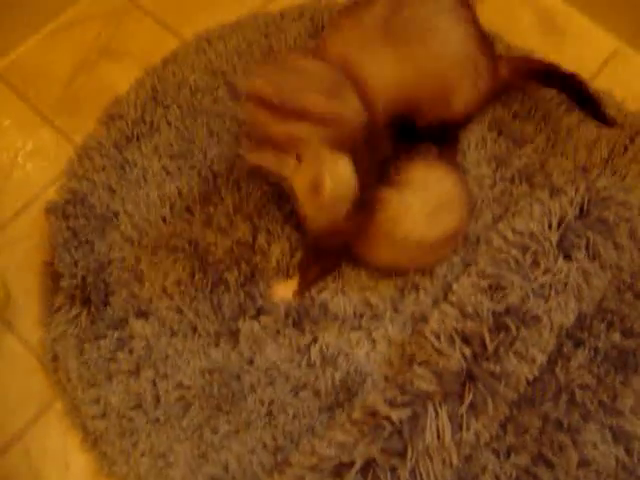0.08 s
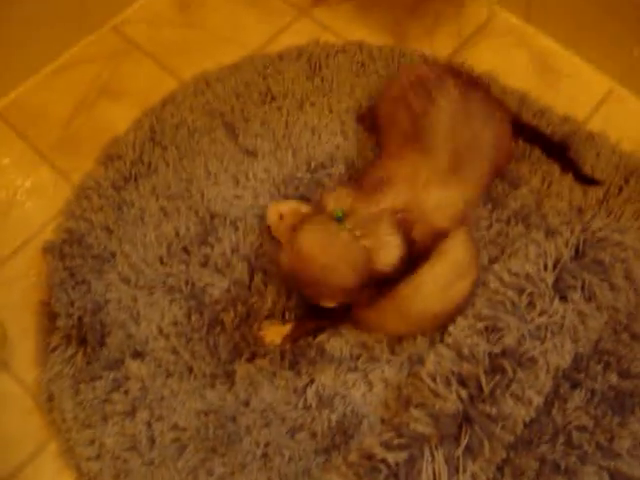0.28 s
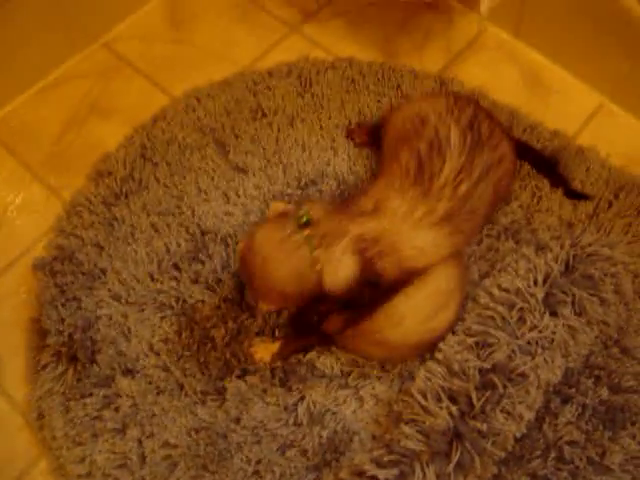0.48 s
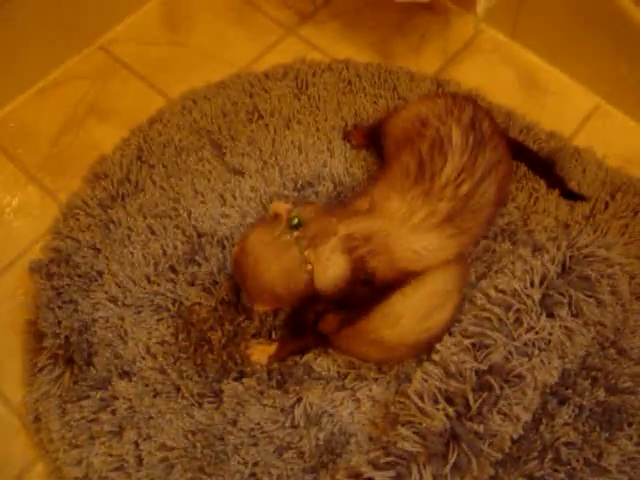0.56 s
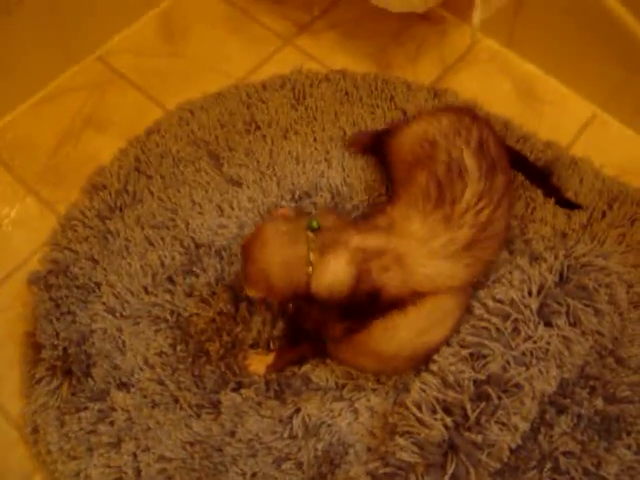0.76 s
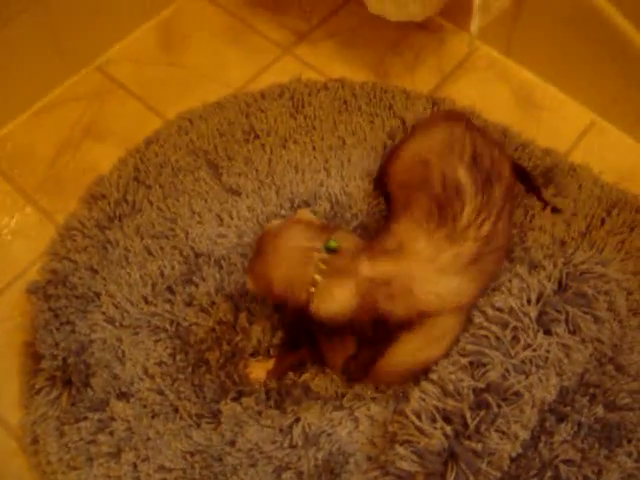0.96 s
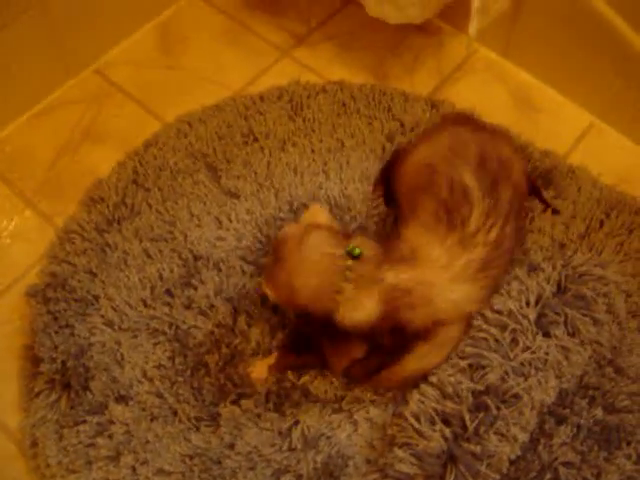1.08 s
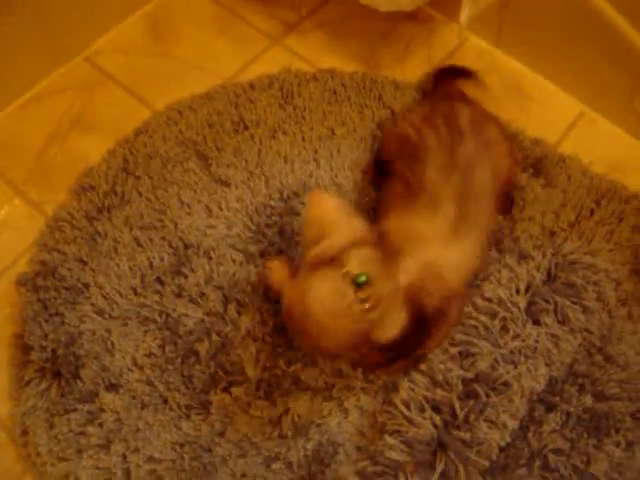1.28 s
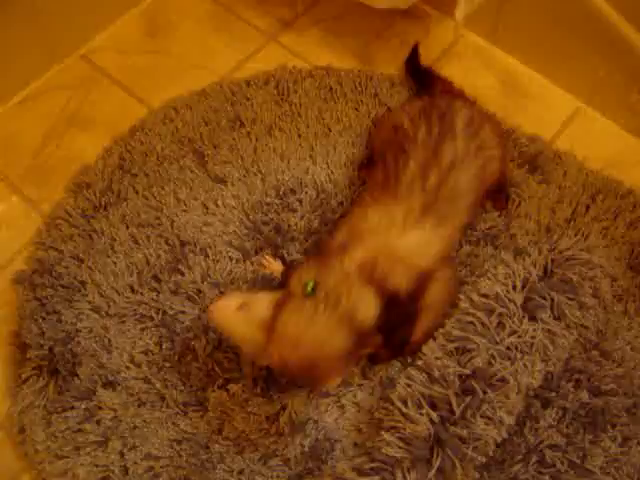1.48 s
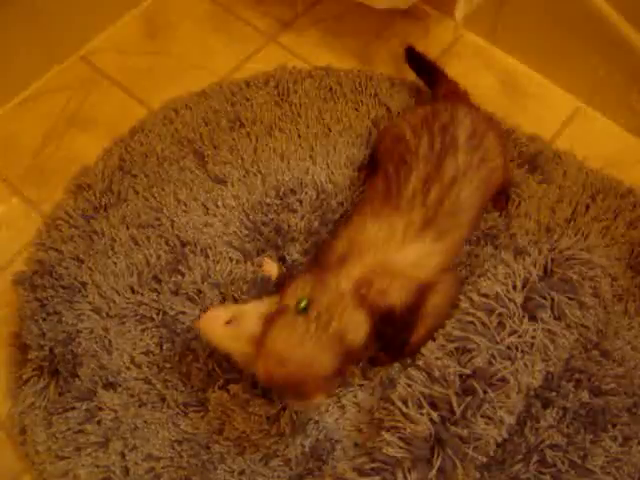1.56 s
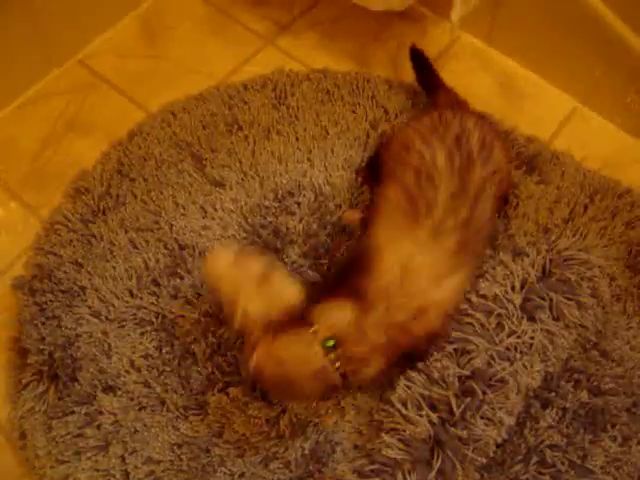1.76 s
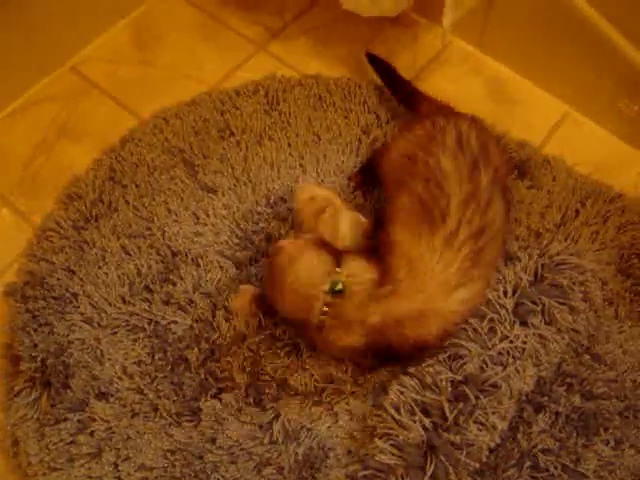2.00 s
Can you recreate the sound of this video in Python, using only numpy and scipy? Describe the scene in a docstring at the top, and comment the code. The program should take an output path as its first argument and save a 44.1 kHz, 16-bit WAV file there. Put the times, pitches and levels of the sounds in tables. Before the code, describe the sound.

Small pet bell jingling in clipped rattles, with faint huffs, soft bumps and one ferret yelp.

```python
"""Ferrets wrestling with a collar bell

Two ferrets tumble in a shaggy pet bed in a quiet tiled room: noise bumps, scratching grains, modal snaps.
A tiny collar bell chatters in short, abruptly ending bursts: one high stuttering mode and rattling clicks.
One ferret huffs (air and two tones), whines thinly (sagging sines) and squeaks once (harmonics and rasp).
Hiss, a low hum and a rumble lie beneath."""
import sys
import numpy as np
from scipy import signal
from scipy.fft import rfft, irfft
from scipy.io import wavfile

SR = 44100
rng = np.random.default_rng(int(sys.argv[2]) if len(sys.argv) > 2 else 0)


def master_out(mix):
    """Clip the mix to full scale and print it as 16-bit PCM to the path in sys.argv[1]."""
    frames = np.transpose(np.atleast_2d(mix))
    ceiling = np.clip(frames, -1, 1)
    pcm = np.round(ceiling * 32767).astype(np.int16)
    wavfile.write(sys.argv[1], SR, pcm)


N = 88200
T = np.arange(N) / SR  # seconds


def amp(db):
    """Decibels to gain."""
    return 10 ** (np.asarray(db) / 20)


def unit(x):
    """Scales to rms 1."""
    return x / np.sqrt(np.mean(abs(x) ** 2) + 1e-20)


def read(points, hz):
    """Reads a table of (frequency, value) on a log-frequency axis."""
    f, value = np.transpose(points)
    return np.interp(np.log(hz + 1), np.log(f + 1), value)


def colour(x, points):
    """Filters x by a table of (Hz, dB), then scales to rms 1."""
    gain = amp(read(points, np.fft.rfftfreq(N, 1 / SR)))
    return unit(irfft(rfft(x) * gain, N))


def drift(width_hz):
    """Smooth random motion: noise under a Gaussian low-pass, at rms 1."""
    hz = np.fft.rfftfreq(N, 1 / SR)
    lowpass = np.exp(-.5 * (hz / width_hz) ** 2)
    return unit(irfft(rfft(rng.standard_normal(N)) * lowpass, N))


def gate(start_s, length_s, edge_s):
    """Opens, holds and shuts with soft edges."""
    inside_s = np.minimum(T - start_s, start_s + length_s - T)
    return np.sin(np.pi / 2 * np.clip(inside_s / edge_s + .5, 0, 1)) ** 2


def blow(start_s, rise_s, t60_s):
    """Quick linear rise on an exponential decay of 60 dB per t60."""
    age = np.maximum(T - start_s, 0)
    return np.minimum(age / rise_s, 1) * np.exp(-np.log(1000) * age / t60_s)


def grains(per_s, spread_db):
    """Random clicks of either sign and uneven size."""
    struck = rng.random(N) < per_s / SR
    return struck * rng.choice([-1, 1], N) * amp(spread_db * rng.standard_normal(N))


def sweep(hz):
    """Running phase in radians of a moving pitch."""
    return 2 * np.pi * np.cumsum(hz) / SR


def background():
    """Steady coloured hiss, a wavering hum with its octave, and an uneven low rumble."""
    # hiss spectrum: frequency_hz, relative_level_db
    air = [(15, -43), (25, -28), (211, -2.5), (879, -7.5), (1640, -11.5), (3760, -14), (10000, -18),
           (13000, -46), (22000, -120)]
    # swell of the hum: time_s, rms_level_db
    hum_level = [(0, -99), (.33, -63.5), (.7, -89.5), (1.1, -70), (2, -66)]
    hum_hz, octave_db, air_db = 117.8, -80.5, -58
    rumble_hz, rumble_db, rumble_swell = 83.5, -71, 0.43
    phase = 2 * np.pi * hum_hz * T + .5 * drift(width_hz=5.5)
    hum = amp(np.interp(T, *np.transpose(hum_level))) * np.sin(phase)
    hum += amp(octave_db) * np.sin(2 * phase)
    swell = np.exp(rumble_swell * drift(width_hz=4.8))
    rumble = unit(drift(width_hz=28) * np.sin(2 * np.pi * rumble_hz * T) * swell)
    hiss = colour(rng.standard_normal(N), air)
    return amp(air_db) * hiss + np.sqrt(2) * hum + amp(rumble_db) * rumble


def room(x):
    """The tail of the tiled room: scattered echoes under a decay set for each frequency."""
    # decay of the room: frequency_hz, t60_s
    room_t60 = [(200, 0.23), (2000, 0.232), (8000, 0.23)]
    taps = grains(per_s=2800, spread_db=7) * (T > .006)  # no echo before 6 ms
    hz, t, z = signal.stft(taps, SR, nperseg=256)
    decay = np.exp(-np.log(1000) * t / read(room_t60, hz)[:, None])
    tail = signal.istft(z * decay, SR, nperseg=256)[1]
    return signal.fftconvolve(x, tail / np.linalg.norm(tail))[:N]


def scuffle():
    """Claws and fur scratch the pile as coloured grains; bodies bump the cushion as dull noise bursts."""
    # scratches in the pile: start_s, length_s, level_db
    scratches = [(0.097, 0.0055, -38.5), (.122, .003, -38.5), (0.129, 0.012, -41.5), (0.205, 0.015, -36.5)]
    # scratch spectrum: frequency_hz, relative_level_db
    scratch_colour = [(4000, -37), (7000, -13), (8300, -6.5), (9900, -6.5)]
    # bumps on the cushion: start_s, level_db, t60_s, lower_edge_hz, upper_edge_hz
    bumps = [(0.239, -44, 0.064, 313, 486), (0.267, -54.5, 0.31, 89.4, 440),
             (0.323, -52.5, 0.08, 687, 1000), (1.662, -42, 0.15, 192, 1210), (1.688, -48, 0.36, 122, 400)]
    scratch = colour(grains(per_s=9220, spread_db=11.0), scratch_colour)
    out = sum(gate(s, length, edge_s=.002) * amp(db) for s, length, db in scratches) * scratch
    for s, db, t60, low_hz, top_hz in bumps:
        band = signal.butter(3, [low_hz, top_hz], "band", fs=SR, output="sos")
        thud = unit(signal.sosfilt(band, rng.standard_normal(N)))
        out += amp(db) * blow(s, .00077, t60) * thud
    return out


def snaps():
    """Small snaps of teeth or claws: a brief noise crack and a few hard, quickly dying modes."""
    # snaps: start_s, level_db
    snap_times = [(0.437, -43.5), (1.418, -38.5), (1.718, -53)]
    # ringing modes of a snap: frequency_hz, relative_level_db, t60_s
    modes = [(2402, -0.5, 0.017), (2710, -3.5, 0.0088), (3300, -5.5, 0.0098), (3870, -1, 0.0087),
             (4550, -4, 0.01)]
    crack_db, crack_t60_s, rise_s = 3, 0.0068, .0005
    out = np.zeros(N)
    for s, db in snap_times:
        ring = sum(amp(mode_db) * blow(s, rise_s, t60) * np.sin(2 * np.pi * (hz * T + rng.random()))
                   for hz, mode_db, t60 in modes)
        crack = amp(crack_db) * blow(s, rise_s, crack_t60_s) * rng.standard_normal(N)
        out += amp(db) * (ring + crack)
    return out


def huffs():
    """Short grunting puffs: air and two firm, wavering tones from a ferret's open mouth."""
    # puffs: start_s, length_s, air_level_db, mouth_resonance_level_db
    puffs = [(0.532, 0.096, -52, -52.5), (0.59, 0.068, -64.5, -61.5), (1.521, 0.12, -55, -68)]
    # breath spectrum: frequency_hz, relative_level_db
    breath = [(300, -3.5), (850, -3), (1150, 1), (1600, -5), (9000, -13.5)]
    lower_hz, upper_hz, waver, upper_db = 926, 1280, .02, -2
    air = colour(rng.standard_normal(N), breath)
    lower, upper = (np.sin(sweep(hz * (1 + waver * drift(width_hz=76)))) for hz in (lower_hz, upper_hz))
    mouth = unit(lower + amp(upper_db) * upper)
    out = np.zeros(N)
    for s, length, air_db, mouth_db in puffs:
        progress = np.clip((T - s) / length, 0, 1)
        puff = np.sin(np.pi * progress ** .5) ** 2  # the root makes it peak early
        out += puff * (amp(air_db) * air + amp(mouth_db) * mouth)
    return out


def whines():
    """Thin wheezy whistles: sines that swell, then sag in pitch and fray."""
    # whines: start_s, length_s, pitch_hz, sag_hz, relative_level_db
    calls = [(1.06, .32, 3650, 520, 0), (1.06, .28, 2700, 130, -8.5), (.84, .3, 1660, 20, -8),
             (1.32, .17, 1625, 5, -2)]
    sag_power, fray, flutter = 2.8, 0.025, 0.63
    out = np.zeros(N)
    for s, length, pitch_hz, sag_hz, db in calls:
        progress = np.clip((T - s) / length, 0, 1)
        hz = pitch_hz - sag_hz * progress ** sag_power
        hz = hz * (1 + fray * progress * drift(width_hz=300))
        swell = np.sqrt(abs(np.sin(np.pi * progress))) * (1 + flutter * drift(width_hz=53))
        out += amp(db) * swell * unit(np.sin(sweep(hz)))
    return out


def squeak():
    """A yelp starts raspy and slides down; upper overtones hold pitch while the mouth resonance sinks."""
    # course of the squeak: time_s, pitch_hz, roughness (0-1), mouth_resonance_hz
    course = [(1.597, 740, .7, 3200), (1.608, 660, .3, 3280), (1.628, 660, .16, 2750),
              (1.67, 654, .14, 2050)]
    # its loudness: time_s, fundamental_db, second_harmonic_db, upper_harmonics_db
    loudness = [(1.5961, -47, -56, -64), (1.597, -39, -44, -39), (1.609, -40.5, -39, -41),
                (1.617, -41, -55.5, -42), (1.628, -54.5, -47, -41), (1.633, -38, -40, -62),
                (1.641, -39, -46.5, -63), (1.658, -61, -75.5, -57), (1.74, -75, -70, -74.5)]
    # throat spectrum: frequency_hz, relative_level_db
    throat = [(600, -20), (1500, 1), (2600, -1), (3250, 1), (3900, -4), (4500, -11), (5500, -23)]
    jitter_depth, shimmer_depth, rasp_depth = 0.07, .8, 1.45  # at roughness 1
    peak_db, peak_width_hz = 6.5, 450  # mouth resonance

    times, *columns = np.transpose(course)
    hz, rough, peak_hz = (np.interp(T, times, c) for c in columns)
    times, *columns = np.transpose(loudness)
    first, second, upper = (amp(np.interp(T, times, c, left=-np.inf, right=-np.inf)) for c in columns)
    jitter = 1 + jitter_depth * rough * drift(width_hz=282)
    settled_hz = hz[-1]
    phase, held = sweep(hz * jitter), sweep(settled_hz * jitter)

    def partial(angle):
        """One harmonic, fluttering with the roughness."""
        shimmer = 1 + shimmer_depth * rough * drift(width_hz=150)
        return np.sqrt(2) * np.sin(angle + 2 * np.pi * rng.random()) * shimmer

    orders = np.arange(3, 8)
    freqs = settled_hz * orders[:, None]
    mouth_peak = peak_db * np.exp(-((freqs - peak_hz) / peak_width_hz) ** 2)
    gains = amp(read(throat, freqs) + mouth_peak)
    gains = gains / np.linalg.norm(gains, axis=0)  # the peak moves without changing total power
    overtones = sum(g * partial(k * held) for k, g in zip(orders, gains))
    # the rasp is noise pulsing once per pitch cycle
    rasp_gain = rasp_depth * rough
    rasp = rasp_gain * colour(rng.standard_normal(N) * (1 + np.cos(phase)), throat)
    top = (overtones + rasp) / np.hypot(1, rasp_gain)
    return first * partial(phase) + second * partial(2 * phase) + upper * top


def bell():
    """Short gated bursts of one high, narrow-band mode at an evened, stuttering level, with rattling clicks."""
    # shakes of the collar bell: start_s, length_s, ring_level_db, pellet_rattle_level_db
    shakes = [(0.018, 0.0089, -53, -63), (0.064, 0.0018, -43.5, -43), (0.19, 0.019, -42.5, -75),
              (0.207, 0.017, -47.5, -44), (0.2306, 0.016, -16, -27.5), (0.258, 0.007, -18, -60),
              (0.2645, 0.018, -24, -44), (0.286, 0.013, -27, -34), (0.305, 0.012, -14.5, -29.5),
              (0.3204, 0.0046, -14.5, -27), (.333, 0.013, -28.5, -43), (0.347, 0.0063, -32, -51),
              (0.36, 0.01, -28, -44), (0.371, 0.027, -36.5, -51), (.405, 0.017, -43, -53),
              (0.445, 0.019, -53.5, -72), (0.509, 0.0051, -50, -75), (1.229, 0.0076, -26, -35),
              (1.239, 0.021, -30, -44), (1.2642, 0.0043, -34.5, -70), (1.27, 0.0095, -46, -45),
              (1.287, 0.043, -45.5, -52.5), (1.344, 0.0032, -42.5, -75), (1.374, 0.0072, -44, -54),
              (1.421, 0.0037, -37.5, -73), (1.427, 0.0097, -48, -48.5), (1.467, 0.0064, -37.5, -47.5),
              (1.507, 0.018, -46, -53), (1.534, 0.0084, -46, -61), (1.599, 0.0082, -37, -42),
              (1.633, 0.03, -55, -57), (1.772, 0.023, -51, -58.5), (1.847, 0.026, -50, -82),
              (1.878, 0.013, -55, -43.5), (1.894, 0.054, -50.5, -58), (1.955, 0.011, -50.5, -52.5),
              (1.969, 0.018, -51, -70), (1.995, 0.0029, -44, -40.5)]
    # pellet rattle spectrum: frequency_hz, relative_level_db
    rattle_colour = [(3900, -29), (4450, -21.5), (5600, -14), (6400, 6), (7700, 5), (8600, -8),
                     (10000, -16)]
    mode_hz, width_hz, steadiness, knee = 6740, 128, 0.82, .4
    stutter_hz, stutter_depth = 117, 0.26
    ring_edge_s, rattle_edge_s = .0022, .004
    wander = steadiness + unit(drift(width_hz) + 1j * drift(width_hz))
    level = wander / np.sqrt(abs(wander) ** 2 + knee ** 2)  # evens out the loudness
    # brief dips wherever the random motion passes through zero
    stutter = 1 - stutter_depth * np.exp(-10 * drift(stutter_hz) ** 2)
    ring = unit((stutter * level * np.exp(2j * np.pi * mode_hz * T)).real)
    rattle = colour(grains(per_s=18000, spread_db=10.5), rattle_colour)
    out = np.zeros(N)
    for s, length, ring_db, rattle_db in shakes:
        out += gate(s, length, ring_edge_s) * amp(ring_db) * ring
        out += gate(s, length, rattle_edge_s) * amp(rattle_db) * rattle
    return out


def scene():
    """Ferrets, bell and room together, each group with its own send to the room."""
    whine_db = -62.5
    play_room_db, squeak_room_db, bell_room_db = -10, -10.5, -38.5
    play = amp(whine_db) * whines() + huffs() + scuffle() + snaps()
    yelp = squeak()
    jingle = bell()
    echo = room(amp(play_room_db) * play + amp(squeak_room_db) * yelp + amp(bell_room_db) * jingle)
    return (play + yelp + jingle + echo + background())[None]


def record(dry):
    """The recorder's band limit: a steep low-pass filter."""
    cutoff_hz = 10080
    lowpass = signal.firwin(301, cutoff_hz, window=("kaiser", 4), fs=SR)
    return signal.oaconvolve(dry, lowpass[None], "same")


dry = scene()
out = record(dry)
master_out(out)
```